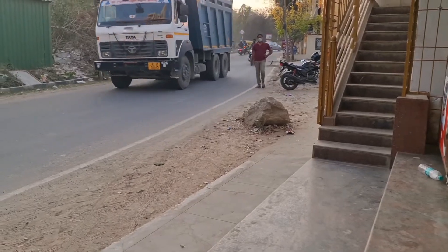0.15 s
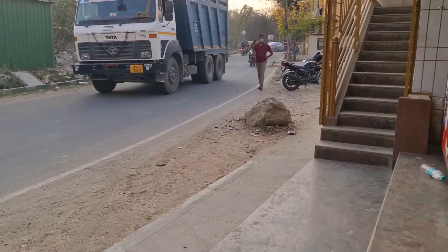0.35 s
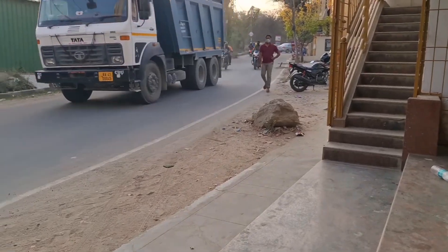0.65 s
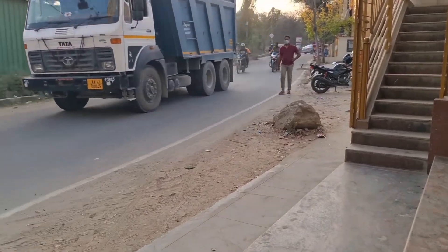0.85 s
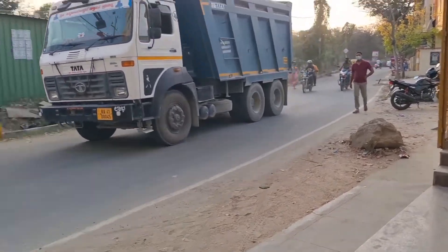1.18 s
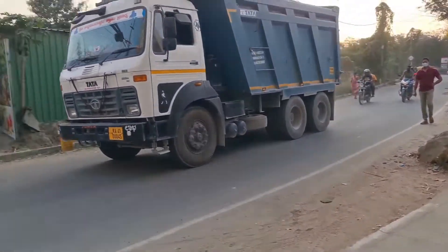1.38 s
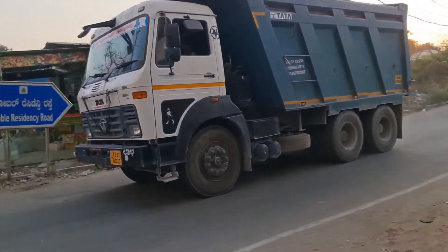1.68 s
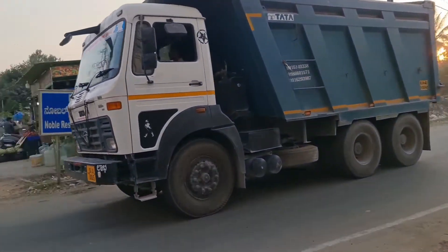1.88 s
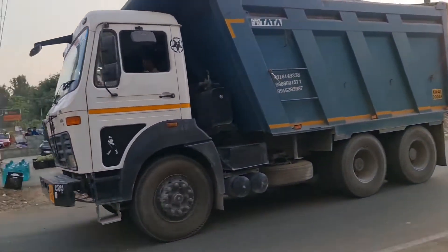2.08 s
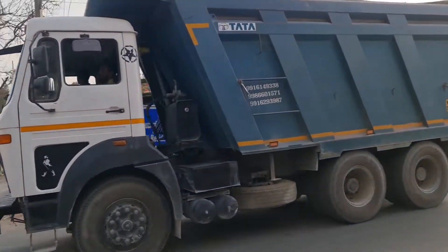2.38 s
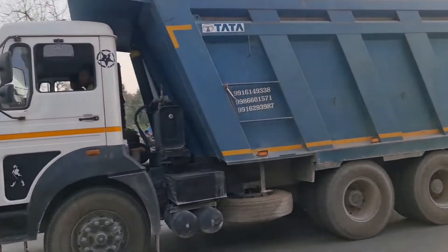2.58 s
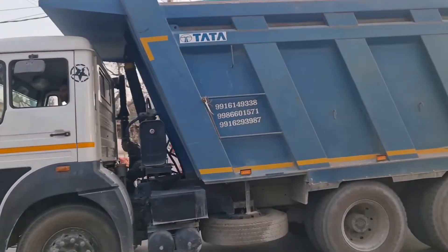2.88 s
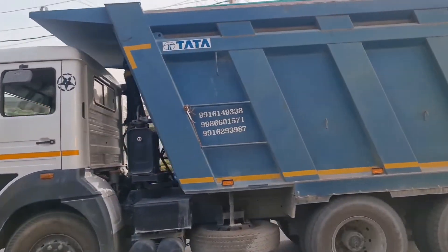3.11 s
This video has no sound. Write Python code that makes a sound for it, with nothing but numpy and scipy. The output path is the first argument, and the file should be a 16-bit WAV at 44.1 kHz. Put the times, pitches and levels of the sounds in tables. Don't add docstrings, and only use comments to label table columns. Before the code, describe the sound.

Heavy truck brakes squeal harshly as it passes close by, after one short twin-horn toot

```python
import sys
import numpy as np
from scipy import signal
from scipy.fft import rfft, irfft, next_fast_len
from scipy.io import wavfile
from scipy.ndimage import uniform_filter1d, map_coordinates

SR = 44100
rng = np.random.default_rng(int(sys.argv[2]) if len(sys.argv) > 2 else 0)


def voltage_ratio(level):
    return 10 ** (np.asarray(level, float) / 20)


def master_out(mix):
    frames = np.transpose(np.atleast_2d(mix))
    ceiling = np.clip(frames, -1, 1)
    pcm = np.round(ceiling * 32767).astype(np.int16)
    wavfile.write(sys.argv[1], SR, pcm)


N = 143325
T = np.arange(N) / SR
SIDES = np.array([[1], [-1]])

# time in seconds, level in dB.
TRAFFIC_LEVEL = [
    (0, -23.5),
    (.2, -28),
    (.68, -26),
    (.74, -27.5),
    (1, -35),
    (1.4, -30),
    (2, -28.5),
    (2.15, -31.5),
    (2.6, -32.5),
    (3.25, -32.5),
]
# frequency in Hz, density in dB per Hz.
ROAD_SPECTRUM = [(250, -8), (400, -16.5), (800, -11), (1500, -14), (3200, -19.5), (7300, -31), (8300, -37),
                 (15800, -45)]
# time in seconds, firing rate in Hz, level in dB.
ENGINE_COURSE = [
    (0, 78, -20),
    (.64, 83.6, -23.5),
    (.74, 80.7, -36),
    (1.0, 83.43, -29),
    (1.9, 71.67, -27.5),
    (2.9, 62.15, -26),
    (3.25, 59.6, -28),
]
# multiple of the firing rate, level in dB.
FIRING_ORDERS = [(.5, -31), (1, 6.5), (1.5, -9.5), (2, -10), (2.5, -23), (3, -5)]
# frequency in Hz, density in dB per Hz.
RUMBLE_SPECTRUM = [(15, -39), (25, -11), (49, -3), (74, 2), (134, -1), (404, -13), (500, -20), (650, -104),
                   (1100, -120)]
# start in seconds, length in seconds, first pitch in Hz, last pitch in Hz, level in dB.
FAR_HORNS = [
    (0.065, 0.092, 750, 757, -27),
    (0.253, 0.036, 738, 740, -40),
    (2.248, 0.14, 796, 798, -41.5),
    (2.515, 0.093, 793, 775, -36),
    (2.72, 0.055, 736, 739, -35.5),
    (2.812, 0.13, 734.5, 748, -38),
    (2.99, 0.076, 747, 736, -36),
]
# frequency in Hz, density in dB per Hz.
PUFF_SPECTRUM = [(410, -35), (700, -6), (1590, -5), (4890, -12.5), (7320, -12), (15800, -37)]
# frequency in Hz, level in dB.
TRUMPET_RESPONSE = [(600, -5.5), (1270, 3.5), (1490, -13), (1700, -4), (3000, -10), (4000, -15),
                    (5600, -6.5), (7500, -11), (8400, -19)]
TOOT_HZ = [346.6, 419.6]
FUNDAMENTAL_DB = [-20, -21]
# start in seconds, length in seconds, level in dB.
LINING_RUBS = [
    (0.795, 0.085, -36),
    (1.018, 0.11, -40.5),
    (1.287, 0.2, -35.5),
    (1.575, 0.35, -31.5),
    (2.216, 0.15, -36.5),
    (2.545, 0.3, -40),
    (3.032, 0.19, -35.5),
]
# frequency in Hz, level in dB.
RUB_SPECTRUM = [(2000, -4), (4000, -7.5), (5500, 0.5), (7300, -3.5), (8500, -7.5), (12500, -16.5),
                (16000, -14.5)]
# start in seconds, length in seconds, first pitch in Hz, last pitch in Hz, level in dB.
SHOE_WHISTLES = [(1.009, .06, 14450, 14600, -43), (1.09, .13, 15000, 15100, -48),
                 (1.25, .1, 15200, 15550, -50), (1.47, 0.076, 14900, 14800, -40),
                 (1.51, .06, 14100, 14350, -46), (1.61, .11, 15450, 15350, -42),
                 (1.75, 0.1, 15400, 14800, -41), (1.756, .09, 14200, 14450, -37),
                 (1.82, .05, 14700, 15100, -37), (1.78, .22, 11600, 11850, -46),
                 (2.026, 0.26, 14500, 14530, -33.5), (2.098, 0.1, 12950, 13600, -44),
                 (2.248, .13, 15100, 15000, -43), (2.366, 0.28, 14550, 14200, -32.5),
                 (2.42, .07, 14100, 14200, -39), (2.415, 0.23, 15650, 15700, -35),
                 (2.622, 0.23, 15500, 15800, -31), (2.487, .19, 13200, 13250, -43),
                 (2.517, .39, 11550, 11970, -41), (2.8, 0.28, 14430, 14500, -34),
                 (2.805, 0.11, 14200, 13950, -38), (2.917, 0.078, 14500, 14500, -28),
                 (2.924, 0.12, 13500, 13400, -34), (2.942, 0.11, 11370, 11250, -46),
                 (3.125, .13, 14650, 14600, -37), (3.19, 0.082, 13900, 14100, -35)]
# time in seconds, squeal pitch in Hz, level in dB, bite (gain of the overtones) in dB.
DRUM_GRABS = [
    [(1.08, 1286, -44, -14), (1.164, 1275, -28.5, -5), (1.202, 1281, -38, -35), (1.28, 1276, -22, -9),
     (1.308, 1276, -11.5, -44), (1.332, 1275, -18, -11), (1.398, 1238, -14, -6),
     (1.454, 1235, -19.5, -10.5), (1.5, 1190, -56, -8)],
    [(1.5, 1246, -25, -12), (1.516, 1236, -21, -15), (1.548, 1248, -34, 0), (1.588, 1237, -35, -1),
     (1.65, 1231, -21.5, -15), (1.664, 1226, -18, -2), (1.726, 1204, -22, -25), (1.752, 1202, -16, -4.5),
     (1.8, 1197, -24.5, -27)],
    [(1.8, 1336, -22, -11), (1.824, 1286, -12, -13), (1.85, 1268, -24, -0.5), (1.896, 1204, -17, -8),
     (2.008, 1160, -21, -17), (2.04, 1197, -23, -2.5), (2.134, 1177, -40, -40), (2.178, 1186, -35, -8),
     (2.2, 1260, -38, -15)],
    [(2.222, 1253, -20.5, -3), (2.242, 1191, -15.5, -6.5), (2.378, 1212, -19.5, -4),
     (2.41, 1234, -13.5, -14), (2.436, 1310, -28.5, -18), (2.484, 1203, -26, -42), (2.5, 1325, -35, -25),
     (2.514, 1200, -24.5, -34), (2.53, 1288, -35, -10)],
    [(2.535, 1284, -27, -10), (2.563, 1258, -17, -15.5), (2.637, 1227, -26, -1), (2.659, 1201, -16.5, -19),
     (2.705, 1174, -28, -10), (2.763, 1184, -20.5, -37), (2.789, 1185, -13.5, -8.5),
     (2.805, 1228, -20, -16.5), (2.89, 1197, -46.5, 0.5)],
    [(3.0, 1267, -23, -38), (3.024, 1202, -8, -20), (3.052, 1195, -20.5, -15.5), (3.112, 1206, -12.5, -30),
     (3.128, 1198, -18, -12.5), (3.168, 1211, -11.5, -11), (3.186, 1231, -23.5, -12),
     (3.208, 1253, -14, -18), (3.25, 1278, -20, -33)],
]
# multiple of the squeal pitch, level in dB, lean to the left in dB.
DRUM_OVERTONES = [(1, 0.5, 1.03), (2, 0.5, 2.6), (3, -15.5, 1.5), (4, -16, 3.5), (5, -13, 1),
                  (6, -30.5, -9), (7, -29, 2.5), (8, -38, -9.5), (9, -37, -8.5)]
# frequency in Hz, level in dB.
RASP_SPECTRUM = [(1500, 0), (2500, -19), (6000, 11), (12000, -25.5)]
# frequency in Hz, time to fall 60 dB in seconds.
FRONT_DECAY = [(300, 1), (1200, 0.32), (4000, 0.38), (12000, 0.013)]
# frequency in Hz, left-right likeness from 0 to 1.
COHERENCE = [(60, 0.88), (200, 0.89), (500, 0), (2000, 0), (8000, 0.065)]


def unit(x):
    return x / np.sqrt(np.mean(x ** 2) + 1e-20)


def along(points, hz):
    f, v = np.transpose(points)
    return np.interp(np.log(hz + 1), np.log(f + 1), v)


def curves(rows):
    s, *cols = np.transpose(rows)
    return [np.interp(T, s, c) for c in cols]


def wobble(rate, t=T):
    return map_coordinates(rng.standard_normal(420), [np.minimum(t * rate, 410)], order=2)


def wobble_pair(rate, t=T):
    return np.array([wobble(rate, t), wobble(rate, t)])


def filtered(x, response):
    m = next_fast_len(N + 8192)
    return irfft(rfft(x, m) * response(np.fft.rfftfreq(m, 1 / SR)), m)[..., :N]


def shape(start, rise, hold, fall, t=T):
    attack = np.clip((t - start) / rise, 0, 1)
    return attack * np.exp(-np.maximum(t - start - rise - hold, 0) / fall)


def rush(spectrum, patchy_db):
    z = signal.stft(rng.standard_normal((2, N)), nperseg=512)[2]
    patches = uniform_filter1d(rng.standard_normal(z.shape[1:]), 5, 0)
    patches = uniform_filter1d(patches, 12, 1)
    noise = signal.istft(z * voltage_ratio(patchy_db * unit(patches)), nperseg=512)[1][:, :N]

    def mid_side_response(hz):
        angle = np.arccos(np.clip(along(COHERENCE, hz), -1, 1)) / 2
        return voltage_ratio(along(spectrum, hz)) * np.array([np.cos(angle), np.sin(angle)])

    mid, side = filtered(noise, mid_side_response)
    return unit(np.array([mid + side, mid - side]))


def street(x):
    hz, t, z = signal.stft(rng.standard_normal((2, SR // 2)), SR, nperseg=256)
    decay = voltage_ratio(-60 * t / along(FRONT_DECAY, hz)[:, None])
    tail = signal.istft(z * decay, SR, nperseg=256)[1]
    tail = tail / np.linalg.norm(tail[0])
    return signal.fftconvolve(np.pad(x, (400, 0))[None], tail, axes=1)[:, :N]


def traffic():
    db, = curves(TRAFFIC_LEVEL)
    road = voltage_ratio(db + 0.38 * wobble(15)) * rush([(120, -19)] + ROAD_SPECTRUM, patchy_db=2)
    screen_s, screen_hz, screen_share = 2.06, 2200, .65
    treble = filtered(road, lambda f: 1 / (1 + (screen_hz / (f + 1)) ** 4))
    return road - screen_share * np.clip((T - screen_s) * 20, 0, 1) * treble


def engine():
    hz, db = curves(ENGINE_COURSE)
    firing_db, rumble_db = -3, -2.5
    phase = 2 * np.pi * np.cumsum(hz * (1 + .02 * wobble(13))) / SR
    beat = np.zeros(N)
    for k, level in FIRING_ORDERS:
        fade = voltage_ratio(level + 3.5 * wobble(16))
        beat += fade * np.sin(k * phase + 1.3 * wobble(6))
    rumble = rush([(15, -40)] + RUMBLE_SPECTRUM + [(900, -115)], patchy_db=1)
    firing = voltage_ratio(firing_db) * unit(beat) * voltage_ratio(-.7 * SIDES)
    return voltage_ratio(db) * (firing + voltage_ratio(rumble_db) * rumble * voltage_ratio(-SIDES))


def far_horns():
    far = np.zeros(N)
    for s, length, first_hz, last_hz, db in FAR_HORNS:
        hz = np.interp(T, [s, s + length], [first_hz, last_hz])
        phase = 2 * np.pi * np.cumsum(hz) / SR + .8 * wobble(30)
        far += voltage_ratio(db + 3.5 * wobble(35)) * shape(s, .02, length, .02) * np.sin(phase)
    return far * voltage_ratio(-1.5 * SIDES) + voltage_ratio(-8) * street(far)


def air_valve():
    envelope = shape(start=0.34, rise=0.058, hold=0.1, fall=0.026)
    return voltage_ratio(-25) * envelope * rush([(300, -40)] + PUFF_SPECTRUM, patchy_db=1)


def horn():
    toot_s, hold_s, fall_s = .696, .05, .026
    high, low = np.zeros(N), np.zeros(N)
    settling = 1 + 0.0441 * np.exp(-np.abs(T - toot_s) / 0.01393)
    for hz, db in zip(TOOT_HZ, FUNDAMENTAL_DB):
        phase = 2 * np.pi * np.cumsum(hz * settling) / SR + .07 * wobble(120)
        for k in range(2, 24):
            level = voltage_ratio(along(TRUMPET_RESPONSE, k * hz) + rng.normal(0, 0.3))
            high += level * np.sin(k * phase + rng.uniform(0, 2.3))
        low += voltage_ratio(db) * np.sin(phase)
    buzz = filtered(rng.standard_normal(N),
                    lambda f: voltage_ratio(along(TRUMPET_RESPONSE, f)) / (1 + (1000 / (f + 1)) ** 4))
    dry = voltage_ratio(-13) * shape(toot_s, .011, hold_s, fall_s) * (unit(high) + .35 * unit(buzz))
    dry += shape(toot_s + 0.02, .04, hold_s, fall_s) * low

    def echo_response(f):
        band = 1 / (1 + (f / 3000) ** 2) / (1 + (300 / (f + 1)) ** 2)
        return voltage_ratio(-17) * np.exp(-2j * np.pi * f * .35) * band

    late = filtered(dry, echo_response)
    return dry * voltage_ratio(.8 * SIDES) + voltage_ratio(-10) * street(dry) + late * voltage_ratio([[-3], [0]])


def linings():
    press = sum(voltage_ratio(db) * shape(s, 0.039, length, 0.11) for s, length, db in LINING_RUBS)
    return press * voltage_ratio(wobble(30)) * rush([(1000, -50)] + RUB_SPECTRUM, patchy_db=2)


def whistle(s, length, first_hz, last_hz, db):
    out = np.zeros((2, N))
    on = (T >= s) & (T < s + length + .1)
    t = T[on]
    hz = np.interp(t, [s, s + length], [first_hz, last_hz]) * (1 + .003 * wobble(20, t))
    width = wobble_pair(130, t - s) + wobble_pair(450, t - s) / 3
    line = width * np.sin(2 * np.pi * np.cumsum(hz) / SR)
    fade = voltage_ratio(db + 4.5 * wobble(35, t))
    out[:, on] = fade * unit(line) * shape(s, .015, length - .02, .015, t)
    return out


def shoes():
    sing = sum(whistle(*row) for row in SHOE_WHISTLES)
    for hz in rng.uniform(10500, 15700, 90):
        a, b, c, d = rng.random(4)
        sing += whistle(1.03 + 2.1 * a, .04 + .08 * b, hz, hz * (.98 + .04 * c), -54 + 8 * d)
    envelope = shape(1.02, .05, 3, .1) + shape(1.01, .03, .2, .08)
    hiss = rush([(6000, -30), (11000, -14), (14300, 0), (16000, 0)], patchy_db=4)
    return sing + voltage_ratio(-43.5) * envelope * hiss


def drum_partials():
    partials = []
    for k, level, lean in DRUM_OVERTONES:
        if k > 1:
            fade_db = 2 * wobble_pair(29)
        else:
            fade_db = 2.5 * wobble(29) * SIDES
        fade = voltage_ratio(level + lean * SIDES + fade_db)
        offset = (0.35 / k ** 3 - .35 * (k > 2) + 0.33 * wobble(9)) * SIDES
        partials.append((k, fade, offset + .28 * k * wobble(110)))
    return partials


def drum_brake():
    out = np.zeros((2, N))
    partials = drum_partials()
    rasp = voltage_ratio(-38.5) * rush(RASP_SPECTRUM + [(16000, -30)], patchy_db=2)
    chatter = (T > 1.7) & (T < 2.08)
    flutter_db = .8 * wobble(28.032) + 2.5 * chatter * wobble(75)
    for rows in DRUM_GRABS:
        hz, db, bite_db = curves(rows)
        start, end = rows[0][0], rows[-1][0] + 0.018
        gate = np.clip(np.minimum(T - start, end - T) / 0.017, 0, 1)
        on = gate > 0
        phase = 2 * np.pi * np.cumsum(hz[on]) / SR
        upper_db = .15 * bite_db[on] - .35 * (db[on] + 22)
        tone = 0
        for k, fade, turn in partials:
            gain_db = 0 if k < 2 else bite_db[on] if k < 3 else upper_db
            tone = tone + fade[:, on] * voltage_ratio(gain_db + flutter_db[on]) * np.sin(k * phase + turn[:, on])
        fringe_phase = phase + 2 * np.pi * 90 * T[on]
        fringe = voltage_ratio(-18) * wobble_pair(120)[:, on] * np.sin(fringe_phase)
        dry = np.zeros((2, N))
        level = (gate * voltage_ratio(db + 4.5))[on]
        dry[:, on] = level * (tone + fringe + rasp[:, on] * (1 + np.cos(phase)))
        out += dry + voltage_ratio(-12) * street(dry[0])
    return out


def scene():
    background = traffic() + engine() + far_horns()
    return background + air_valve() + horn() + linings() + shoes() + drum_brake()


def roll_off(x):
    return signal.sosfilt(signal.butter(12, 16630, fs=SR, output="sos"), x)


def record(dry):
    ceiling, lag_s, top_hz = .98, 9e-5, 15850
    x = dry / (1 + np.abs(dry / ceiling) ** 6) ** (1 / 6)
    x = filtered(x, lambda hz: (hz < top_hz) * np.exp(1j * np.pi * hz * lag_s * SIDES))
    return roll_off(x)


dry = scene()
out = record(dry)
master_out(out)
```